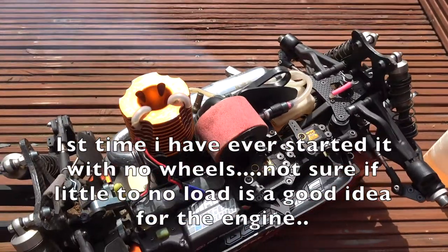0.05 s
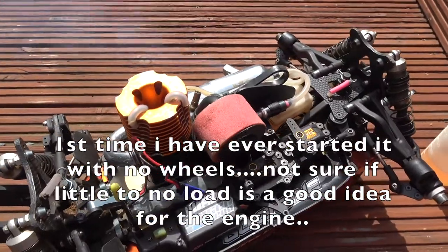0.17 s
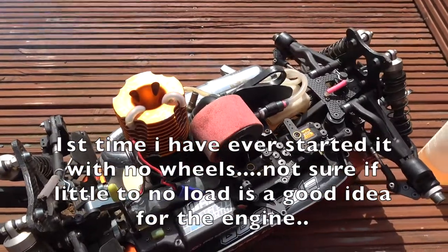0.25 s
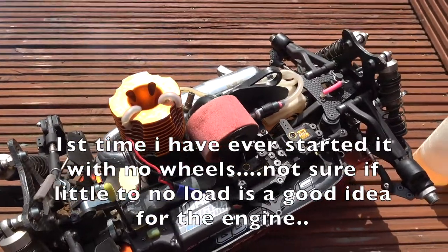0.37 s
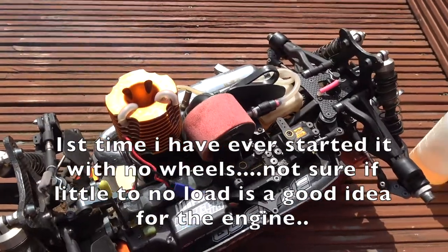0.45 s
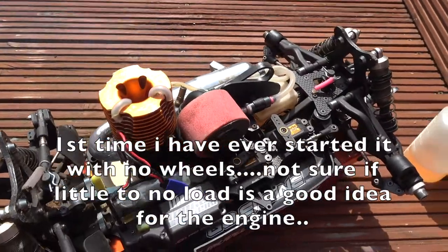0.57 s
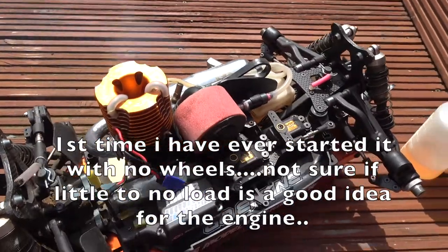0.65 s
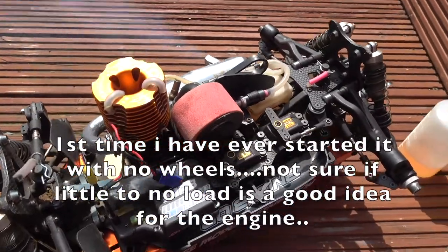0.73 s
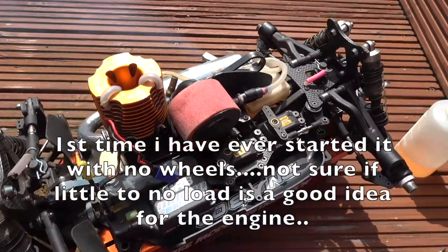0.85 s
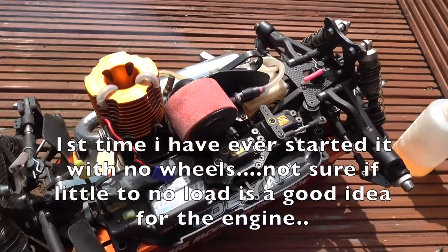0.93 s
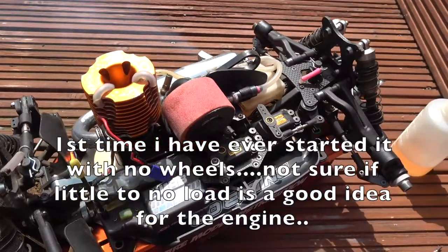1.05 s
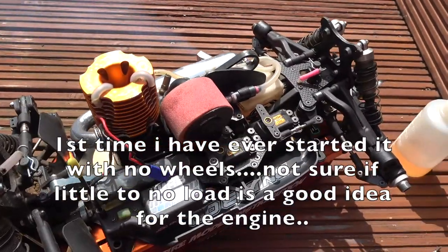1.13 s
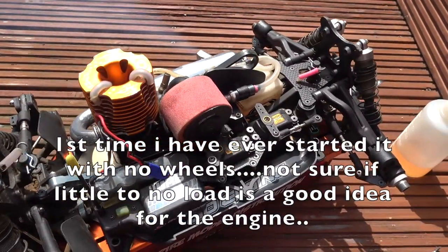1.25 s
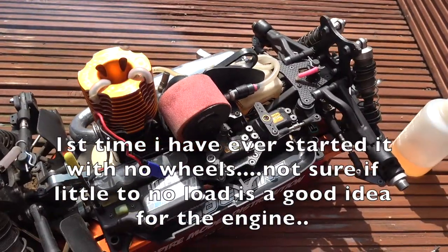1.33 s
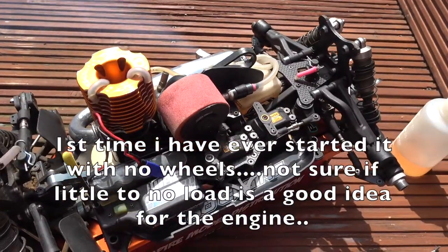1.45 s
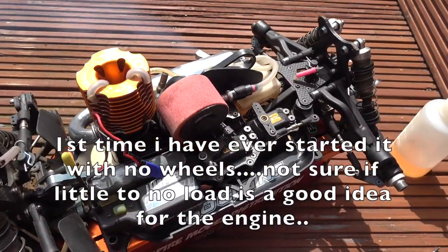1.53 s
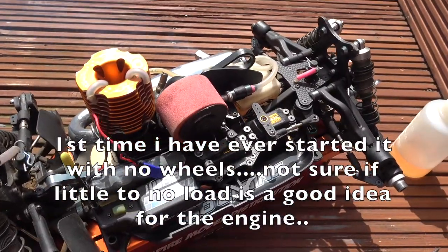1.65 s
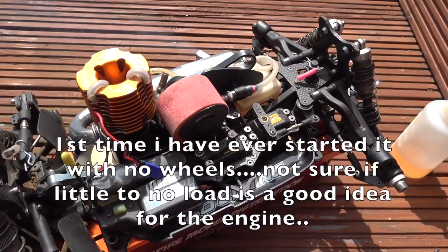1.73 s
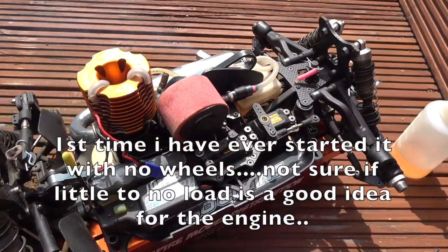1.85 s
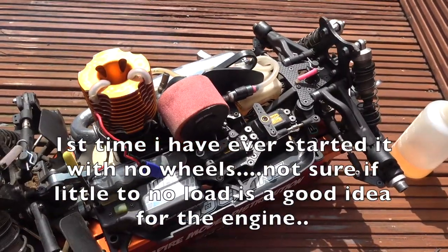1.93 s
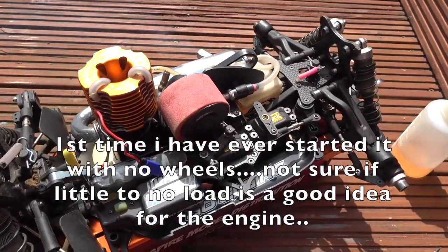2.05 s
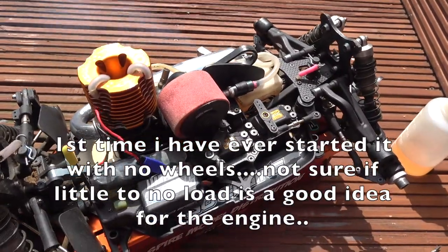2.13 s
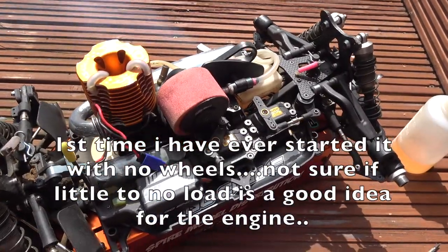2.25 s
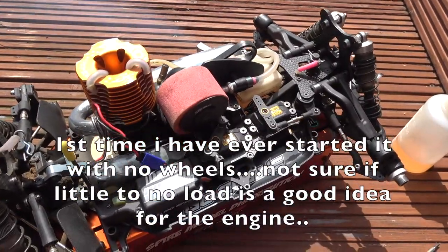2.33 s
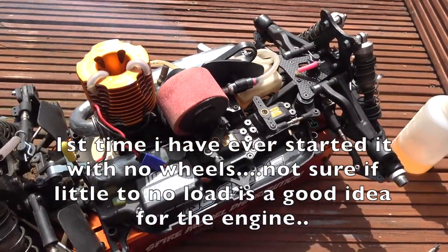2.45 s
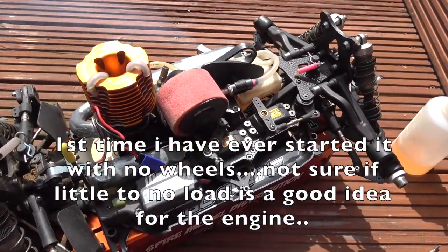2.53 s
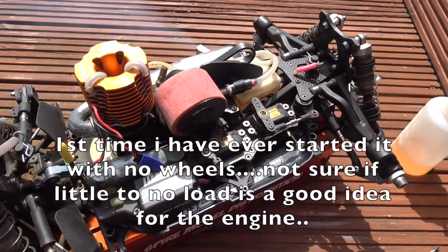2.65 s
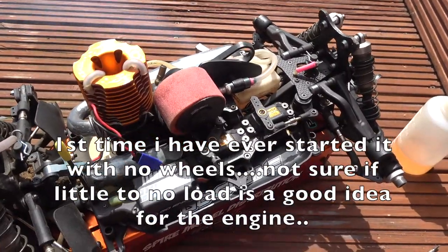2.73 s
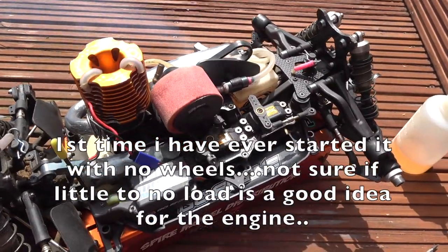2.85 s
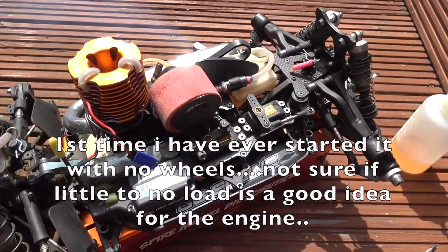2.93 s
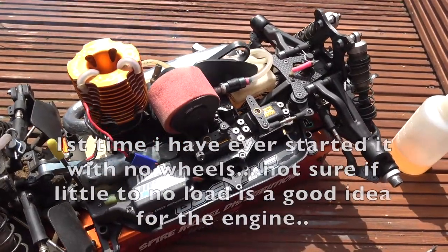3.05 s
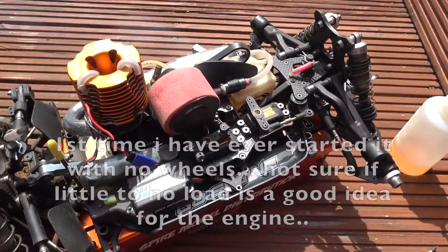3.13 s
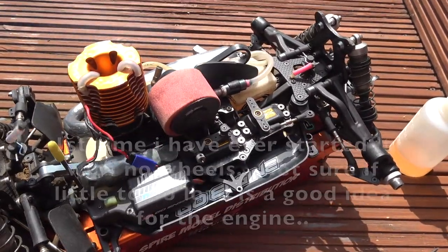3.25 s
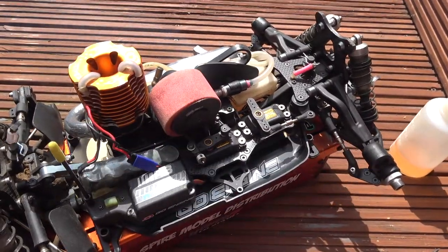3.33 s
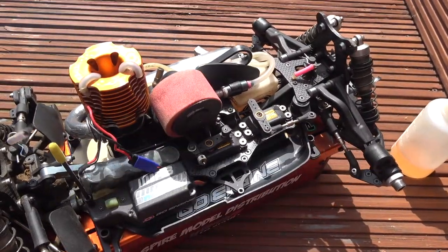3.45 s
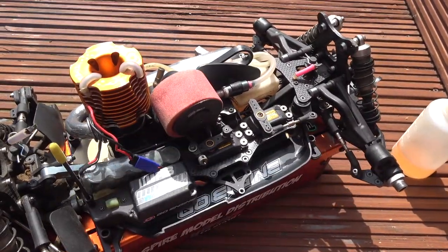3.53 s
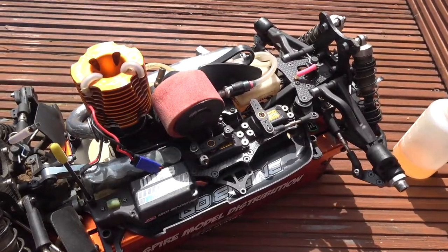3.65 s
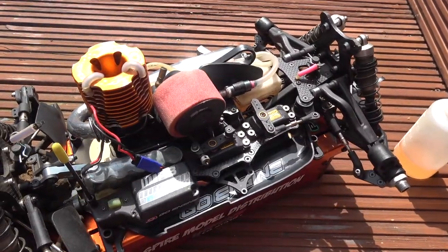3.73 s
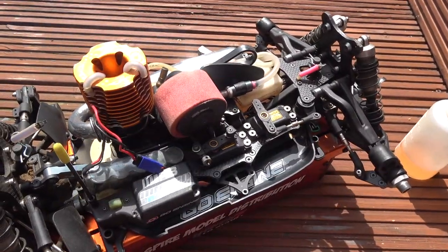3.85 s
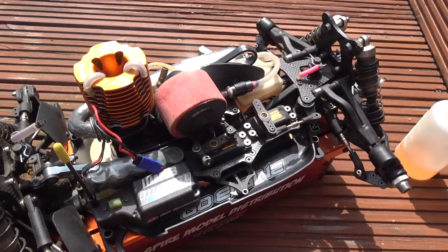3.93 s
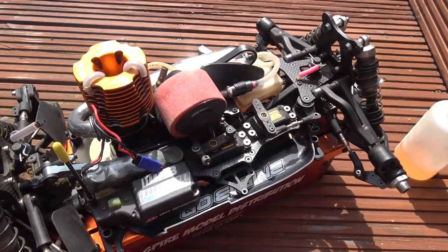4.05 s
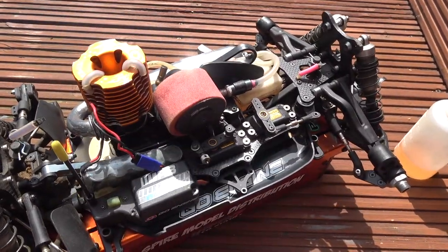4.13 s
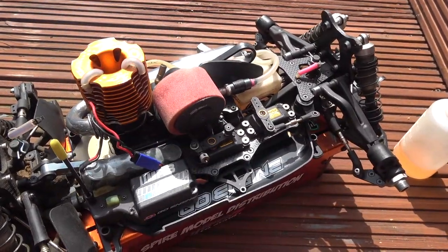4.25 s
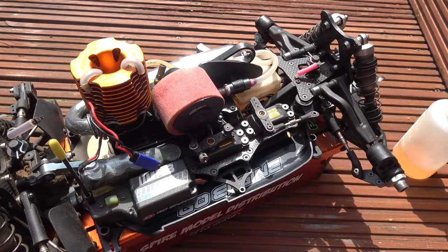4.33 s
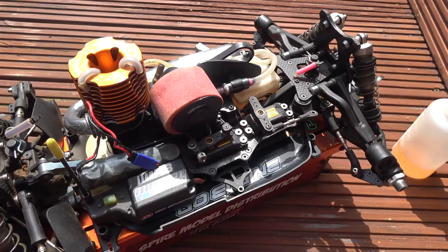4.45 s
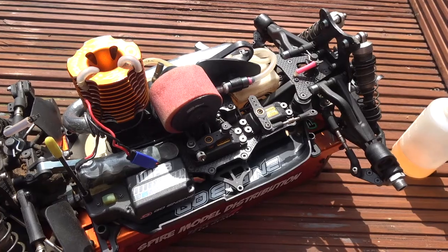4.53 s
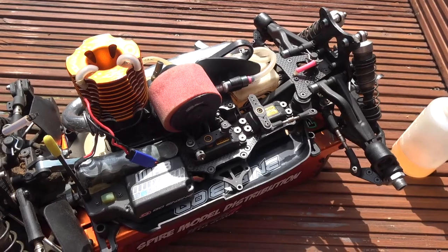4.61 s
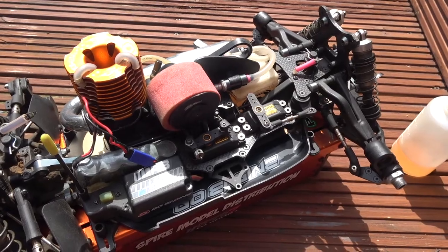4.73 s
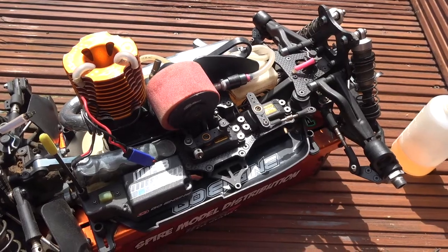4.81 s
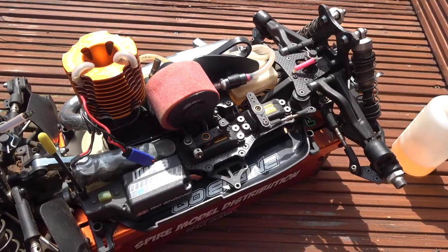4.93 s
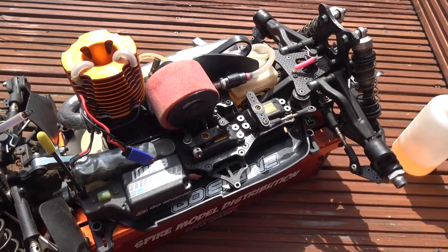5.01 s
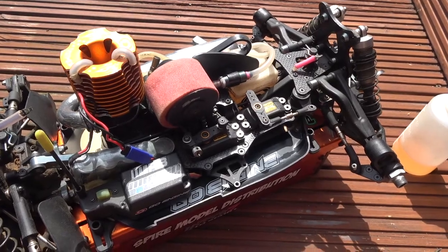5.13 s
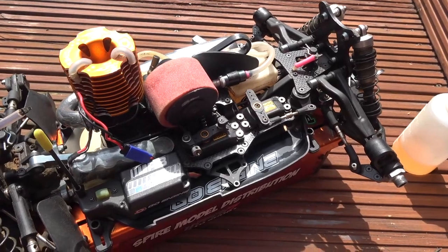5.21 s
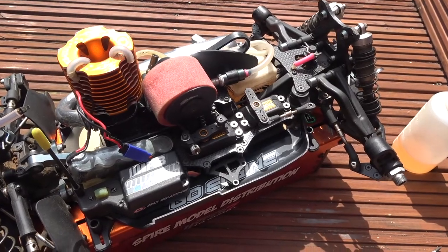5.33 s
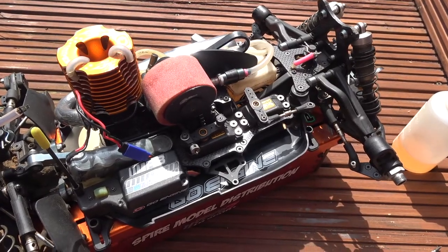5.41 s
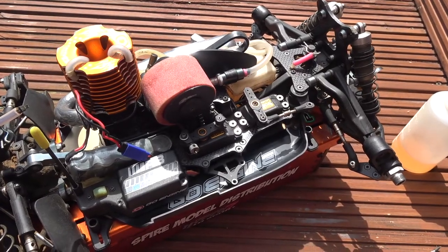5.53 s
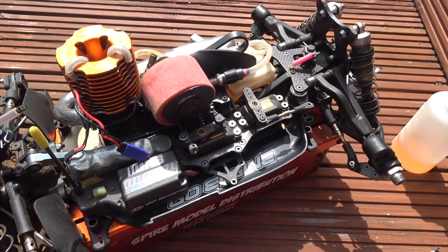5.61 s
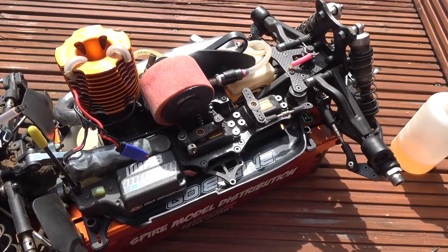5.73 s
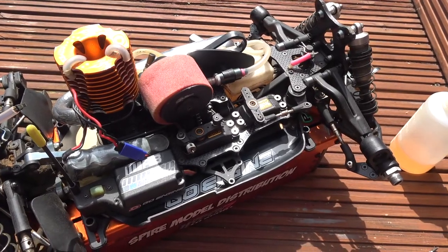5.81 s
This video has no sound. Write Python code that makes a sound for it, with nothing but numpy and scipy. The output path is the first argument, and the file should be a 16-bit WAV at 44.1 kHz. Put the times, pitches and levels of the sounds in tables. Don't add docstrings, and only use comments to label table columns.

```python
import sys
import numpy as np
from scipy import signal
from scipy.fft import rfft, irfft
from scipy.io import wavfile
from scipy.ndimage import uniform_filter1d

SR = 44100
rng = np.random.default_rng(int(sys.argv[2]) if len(sys.argv) > 2 else 0)


def nominal_scale(level):
    x = np.asarray(level, float) / 20
    return 10 ** x


def int16_out(signal):
    q = np.round(np.clip(np.atleast_2d(signal).T, -1, 1) * 32767)
    wavfile.write(sys.argv[1], SR, q.astype(np.int16))


N = 258867
HZ = np.fft.rfftfreq(N, 1 / SR)

# (time [s], peak [dB], metal crack against the peak [dB])
HARD_FIRINGS = [(3.5113, -12.5, -11), (3.5916, -11.5, -16), (3.632, -13.5, -18), (3.6629, -12, -17),
                (3.7153, -10.5, -17), (3.7871, -10, -16), (3.8365, -10, -15), (3.8655, -14, -17),
                (3.9448, -13, -27), (3.9947, -10.5, -15), (4.0231, -11.5, -18), (4.0421, -11, -25),
                (4.0725, -12, -26), (4.1019, -11, -22), (4.1408, -11, -20), (4.1912, -10, -18),
                (4.2107, -11, -27), (4.2491, -10.5, -23), (4.2985, -13, -21), (4.3174, -6.5, -12.5),
                (4.3543, -8.5, -15.5), (4.3818, -12, -22), (4.4192, -7.5, -16.5), (4.4466, -11, -26),
                (4.4661, -13, -27), (4.4855, -10, -20), (4.5334, -10.5, -24), (4.5629, -9.5, -20),
                (4.5913, -8.5, -16), (4.6187, -9.5, -26.5), (4.6472, -7.5, -15.5), (4.6751, -7.5, -16),
                (4.7031, -6.5, -13), (4.731, -9, -25), (4.7599, -9, -24), (4.7894, -6, -19),
                (4.8083, -8, -23), (4.8452, -6.5, -25), (4.8826, -9, -22), (4.9011, -8, -20),
                (4.9285, -8, -24), (4.9465, -9, -20), (4.9744, -7, -26), (5.0313, -4.5, -17.5),
                (5.0682, -7.5, -20), (5.0867, -6, -21), (5.1046, -8, -20), (5.151, -5.5, -22),
                (5.1874, -4.5, -21.5), (5.2244, -6, -17), (5.2428, -4.5, -16), (5.2703, -4.5, -13),
                (5.2977, -3, -13.5), (5.3251, -6.5, -26), (5.3431, -9, -22), (5.3616, -3.5, -24),
                (5.38, -4, -20), (5.4079, -8, -27), (5.4259, -6, -18), (5.4538, -5, -17), (5.4813, -5, -24),
                (5.5182, -5, -19), (5.5461, -3, -19), (5.5826, -4, -17), (5.6095, -2, -17),
                (5.6274, -8, -25), (5.6464, -3, -20), (5.6743, -2, -19), (5.7008, -2.5, -16),
                (5.7372, -3.5, -22), (5.7552, -1, -14.5), (5.7826, -2.5, -19), (5.809, -2.5, -18),
                (5.837, -4, -21), (5.8554, -0.5, -20)]
# (time [s], how settled the orders are [0-1], strong-weak alternation of turns [0-1])
HELD_THROTTLE = [(0, 1, 1), (.19, 0.98, 0.88), (.25, 0, 0), (.77, 0.27, 0.3), (.82, 0.91, 0.3),
                 (.87, 0.98, 1), (1.6, 0.91, 0.94), (1.66, 0, 0), (2.21, 0.17, 0.07), (2.26, 0.91, 0.2),
                 (2.3, 0.94, 1), (2.99, 1, 0.9), (3.05, 0, 0)]


def read(table):
    s, *columns = np.transpose(table)
    return [np.interp(np.arange(N) / SR, s, c) for c in columns]


def over_hz(points):
    hz, value = np.transpose(points)
    return np.interp(np.log(HZ + 1), np.log(hz), value)


def unit(x):
    return x / np.sqrt(np.mean(x ** 2))


def ring(x, modes, order=1):
    bank = 0
    for k, (f, width, db) in enumerate(modes):
        detuning = (HZ / f - f / (HZ + 1e-9)) * f / width
        bank = bank + (-1) ** k * nominal_scale(db) / (1 + 1j * detuning) ** order
    return irfft(rfft(x) * bank, N)


def walk(rate, channels=1):
    hold = int(SR / rate)
    steps = np.repeat(rng.standard_normal((channels, N // hold + 1)), hold, axis=1)
    return 1.26 * uniform_filter1d(steps, hold, axis=1)[:, :N]


def pulses(turns, size):
    at = np.flatnonzero(np.diff(np.floor(turns)) > 0)
    late = (np.floor(turns[at + 1]) - turns[at]) / (turns[at + 1] - turns[at])
    out = np.zeros(N)
    out[at], out[at + 1] = (1 - late) * size[:len(at)], late * size[:len(at)]
    return out


def crank(hz):
    turns = np.cumsum(hz) / SR
    at = (np.array(HARD_FIRINGS)[:, 0] * SR).astype(int)
    gaps = np.round(np.diff(turns[at], prepend=turns[at[0]]))
    gaps = np.maximum(gaps, at > at[0])
    whole = np.round(turns[at[0]]) + np.cumsum(gaps)
    slip = np.interp(np.arange(N), np.r_[at[0] - SR // 10, at], np.r_[0, whole - turns[at]])
    return turns + slip, whole.astype(int)


def song(turns, hz, first_db, song_db):
    # (multiple of half the crank speed, level [dB])
    orders = [(1, -25.5), (2, 0), (3, -16), (4, -5), (5, -21), (6, -8.5), (7, -7), (8, 4.5), (9, -19),
              (10, -5.5), (11, -19), (12, -5), (13, -14.5), (14, -7.5), (15, -5.5), (16, -5.5), (17, -39.5),
              (18, -11), (19, -12.5), (20, -10.5), (21, -9), (22, -12), (23, -14.5), (24, -7.5),
              (25, -18.5), (26, -7), (27, -15), (28, -15), (29, -13), (30, -20), (31, -17), (32, -27.5),
              (33, -26), (34, -15), (35, -33), (36, -26), (37, -23), (38, -15), (39, -25), (40, -16.5)]
    # (frequency [Hz], width [Hz], level [dB])
    swept_modes = [(485, 116, -0.5), (986, 226, -2.5), (1420, 105, -4.5), (1850, 220, -11),
                   (2410, 220, -2.5), (2710, 200, -5.5), (3310, 240, -3), (4300, 240, -4),
                   (5240, 630, -11.5), (7530, 980, -11)]
    song_speed_hz = 565
    settled, alternate = np.clip(read(HELD_THROTTLE), 0, 1)
    waver = walk(18, channels=2 * len(orders)).reshape(2, len(orders), N)
    start = 2 * np.pi * rng.random(len(orders))
    idling_db = -7.0 * np.log2(np.clip(hz / 200, 0, 1)) ** 2
    low, high = 0, 0
    for k, (half, db) in enumerate(orders):
        phase = np.pi * half * turns + start[k] + 0.17 * waver[1, k]
        line = nominal_scale(1.85 * waver[0, k]) * np.sin(phase) * np.sqrt(2)
        if half == 2:
            gain = nominal_scale(first_db + 2.39 * idling_db)
        else:
            gain = nominal_scale(song_db + db - 6.0) * (alternate if half % 2 else settled)
        if half < 6:
            low = low + line * gain
        else:
            high = high + line * gain
    uneven = nominal_scale(1.7 * rng.standard_normal(N // 50))
    beats = ring(pulses(turns, uneven), swept_modes) / np.sqrt(hz / song_speed_hz)
    sweep = nominal_scale(song_db + idling_db + 25.5) * np.sqrt(1 - settled ** 2) * beats
    return low * nominal_scale(np.array([[.8], [-.8]])) + high + sweep


def exhaust(turns, fired, hz, puff_db):
    # (frequency [Hz], width [Hz], level [dB])
    pipe_modes = [(208.4, 67, -3.5), (314, 89, -9.5), (436, 114, -3.5), (570, 160, -15.5), (813, 118, -8),
                  (1286, 600, 3), (2144, 220, -5), (2660, 130, -11.5)]
    # (frequency [Hz], width [Hz], level [dB])
    metal_modes = [(2090, 200, 2), (2740, 140, -2), (3540, 150, -2), (4070, 180, -4), (5120, 310, -4),
                   (7150, 155, -4), (9000, 1800, -20)]
    # (time [s], peak [dB], metal crack against the peak [dB])
    catches = [
        (0.6632, -17, -14),
        (0.684, -11, -11),
        (0.6978, -7.5, -3),
        (2.1258, -13, -10),
        (2.1391, -14, -6),
    ]
    at = np.flatnonzero(np.diff(np.floor(turns)) > 0)
    chance = rng.standard_normal((len(at), 2)).T
    speed = hz[at] / 100
    size_db = puff_db[at] - 0.87 * np.log2(speed) ** 2 + 1.5 * chance[0]
    size = nominal_scale(size_db) / np.sqrt(speed)
    crack = size * nominal_scale(-34 + 2.5 * chance[1])
    row = np.clip(fired - int(turns[at[0] + 1]), 0, len(at) - 1)
    _, peak_db, crack_db = np.transpose(HARD_FIRINGS)
    size[row] = nominal_scale(peak_db - 11)
    crack[row] = nominal_scale(peak_db + crack_db - 6)
    puffs, cracks = pulses(turns, size), pulses(turns, crack)
    for s, peak_db, crack_db in catches:
        puffs[int(s * SR)] += nominal_scale(peak_db - 10.5)
        cracks[int(s * SR)] += nominal_scale(peak_db + crack_db - 0.5)
    decay = np.exp(-1 / (0.0046 * SR))
    burst = signal.lfilter([1], [1, -decay], cracks) * rng.standard_normal(N)
    through_pipe = nominal_scale(34.5) * ring(puffs, pipe_modes, order=3)
    return through_pipe + nominal_scale(13) * ring(burst + 3.6 * cracks, metal_modes)


def rasp(turns, hz, rasp_db):
    # (frequency [Hz], density [dB per Hz])
    held_colour = [(88, -72), (150, -31.5), (501, -29), (563, 0.5), (632, -35), (1030, -18), (1110, -18),
                   (1520, -35), (1640, -15.5), (2240, -15), (2420, -13), (4330, -12), (15600, -22)]
    # (frequency [Hz], density [dB per Hz])
    fast_colour = [(180, -34), (300, -11.5), (653, -8.5), (783, -14), (955, -6), (1130, -11), (1370, -17),
                   (1590, -4), (2180, 1.5), (4300, 1.5), (15600, -15.5)]
    # (frequency [Hz], density [dB per Hz])
    slow_colour = [(88, -34), (150, -15), (201, -17), (259, -22), (412, -9), (697, -18.5), (798, -16),
                   (1300, -0.5), (1740, -16), (2190, -12.5), (2420, -13.5), (7180, -28.5), (15600, -42.5)]
    held = np.clip(read(HELD_THROTTLE)[0], 0, 1)
    fast = np.clip((hz - 110) / 120, 0, 1)
    gate = (.5 + 0.62 * np.exp(-(turns % 1) / 0.28)) * nominal_scale(1.36 * walk(40)[0])
    mid, side = rfft(gate * rng.standard_normal((2, N)))
    apart = np.clip(HZ / 14000, .08, .4)
    ports = mid + apart * side * np.array([[1], [-1]])
    colours = (held_colour, fast_colour, slow_colour)
    loaded, quick, slow = (unit(irfft(ports * nominal_scale(over_hz(c)), N)) for c in colours)
    at_speed = held * loaded * nominal_scale(-3.5) + (fast - held * fast) * quick * nominal_scale(-2)
    return nominal_scale(rasp_db) * (at_speed + (1 - fast) * slow * nominal_scale(6.5))


def bell(hz):
    # (time [s], level [dB])
    whistle = [(0.0, -39), (0.31, -43), (0.54, -45), (0.67, -62), (0.7, -46), (0.73, -38), (1.65, -37),
               (1.67, -34), (1.96, -42.5), (2.11, -58), (2.16, -39), (2.91, -36), (3.11, -40), (3.6, -56),
               (4.58, -64), (4.9, -57), (4.92, -41), (4.95, -59), (5.07, -53), (5.21, -43), (5.25, -50),
               (5.28, -47), (5.56, -39.5), (5.57, -43.5), (5.87, -39.5)]
    # (frequency [Hz], width [Hz], level [dB])
    bell_modes = [(9480, 150, 7), (13350, 170, -1), (9150, 460, -14), (12100, 200, -22)]
    level_db, = read(whistle)
    fits = nominal_scale(2.4 * walk(35)[0])
    grazing = unit(ring(fits * rng.standard_normal(N), bell_modes))
    return nominal_scale(level_db + 1.5) * np.clip((330 - hz) / 150, 0, 1) * grazing


def deck():
    # (time [s], level [dB])
    shaking = [(0.0, -60), (0.13, -69), (0.23, -59), (0.29, -79), (0.67, -90), (0.75, -55), (0.9, -60),
               (1.0, -71), (1.16, -65), (1.58, -64), (1.68, -58), (1.77, -80), (2.03, -82), (2.26, -51),
               (2.34, -69), (2.4, -54), (2.5, -62), (2.65, -61), (2.81, -71), (2.97, -64), (3.16, -80),
               (4.63, -75), (4.69, -60), (4.79, -77), (4.95, -75), (5.13, -78), (5.28, -79), (5.38, -73),
               (5.87, -67)]
    # (time [s], peak [dB], pitch [Hz])
    hops = [
        (0.885, -33, 248),
        (2.14, -28, 188.1),
        (2.259, -35, 207),
        (2.409, -42, 253.8),
    ]
    level_db, = read(shaking)
    boards = signal.butter(3, [42, 160], "band", fs=SR, output="sos")
    mid, side = signal.sosfilt(boards, rng.standard_normal((2, N)))
    out = nominal_scale(level_db + 5.5) * unit(mid + 0.28 * side * np.array([[1], [-1]]))
    t = np.arange(SR // 10) / SR
    swell = t / 0.0046 * np.exp(-t / 0.0051)
    for s, peak_db, hz in hops:
        i = int(s * SR)
        out[:, i:i + len(t)] += nominal_scale(peak_db + 7.5) * swell * np.sin(2 * np.pi * hz * t)
    return out


def garden(engine):
    t = np.arange(SR // 4) / SR
    tail = rng.standard_normal((2, SR // 4)) * nominal_scale(-60 * t / 0.16)
    return nominal_scale(-50) * signal.fftconvolve(engine, tail, axes=1)[:, :N]


def scene():
    # (time [s], crank speed [Hz])
    crank_speed = [(0.0, 557.2), (0.16, 547.8), (0.19, 545), (0.24, 483.0), (0.34, 319.4), (0.46, 215.2),
                   (0.5, 170.5), (0.65, 106.4), (0.67, 135.7), (0.69, 219.6), (0.7, 279.7), (0.72, 346),
                   (0.73, 407), (0.75, 458.6), (0.77, 496.3), (0.8, 563.9), (0.85, 591.1), (1.01, 566),
                   (1.26, 557.6), (1.5, 565.6), (1.6, 558), (1.67, 481), (1.8, 293), (1.89, 213.4),
                   (1.99, 141), (2.06, 120), (2.09, 102.1), (2.11, 132.4), (2.12, 210), (2.14, 267.2),
                   (2.16, 333.7), (2.17, 394), (2.19, 434.5), (2.22, 517.4), (2.24, 553.7), (2.27, 591.2),
                   (2.6, 555.7), (2.66, 583), (2.71, 572.6), (2.94, 563), (2.99, 548.1), (3.04, 496),
                   (3.2, 264.6), (3.27, 216.7), (3.37, 147.5), (3.4, 137.7), (3.43, 132.1), (3.55, 98.7),
                   (3.68, 96.2), (3.99, 100.7), (4.02, 101), (4.09, 99.9), (4.22, 101), (4.3, 99),
                   (4.35, 106.3), (4.43, 106), (4.48, 100.8), (4.54, 102), (4.59, 106), (4.79, 100),
                   (4.82, 106.5), (4.92, 107.8), (5.0, 107), (5.12, 108.7), (5.87, 107.4)]
    # (time [s], first order [dB], song [dB], puff [dB], rasp [dB])
    engine_levels = [(0.0, -18.5, -15, -37, -16), (0.15, -18.5, -15.5, -22, -19.5),
                     (0.23, -17.5, -17, -31, -17), (0.28, -19.5, -14, -31, -15),
                     (0.33, -36.5, -15.5, -27, -17), (0.44, -31.5, -22.5, -28, -20.5),
                     (0.55, -48, -39.5, -35, -35.5), (0.57, -47, -34, -33, -31.5),
                     (0.65, -40, -42, -30, -41), (0.7, -34.5, -14, -17, -24), (0.73, -35, -13, -31, -18),
                     (0.75, -24, -10.5, -30, -14), (0.78, -18, -9.5, -6, -17.5),
                     (0.83, -20.5, -13.5, -28, -26), (0.88, -17.5, -16, -42, -20),
                     (1.0, -18, -14.5, -34, -23), (1.14, -18.5, -15, -21, -19.5),
                     (1.57, -22.5, -15, -22, -22), (1.68, -14.5, -15.5, -31, -13.5),
                     (1.75, -33, -13, -25, -17), (1.81, -35, -20, -40, -19.5),
                     (1.86, -31, -17.5, -24, -22.5), (2.01, -46, -41.5, -31, -35),
                     (2.11, -41, -39, -26, -39), (2.14, -38, -13, -19, -23), (2.16, -30, -10, -28, -16),
                     (2.17, -35.5, -11, -26, -16.5), (2.21, -17, -9, -22, -16), (2.22, -17.5, -9, -2, -20),
                     (2.29, -19, -15, -36, -19.5), (2.52, -20, -16, -17, -20), (2.63, -20, -14.5, -13, -21),
                     (2.66, -17, -15, -39, -19), (2.76, -20.5, -15, -29, -19), (2.96, -17.5, -15, -27, -20),
                     (3.01, -18, -16, -32, -18), (3.07, -18.5, -16, -27, -14.5),
                     (3.12, -34, -15.5, -25, -16.5), (3.25, -32.5, -23.5, -23, -23.5),
                     (3.35, -38, -36.5, -38, -30.5), (3.56, -42.5, -38, -30, -42),
                     (5.4, -30.5, -38, -19.5, -32.5), (5.87, -31.5, -29, -18, -33)]
    hz, = read(crank_speed)
    first_db, song_db, puff_db, rasp_db = read(engine_levels)
    turns, fired = crank(hz)
    engine = song(turns, hz, first_db, song_db) + exhaust(turns, fired, hz, puff_db) + bell(hz)
    return engine + garden(engine) + rasp(turns, hz, rasp_db) + deck()


def low_pass(x):
    return signal.sosfilt(signal.butter(12, 15780, fs=SR, output="sos"), x)


def record(dry):
    # (frequency [Hz], left minus right [dB])
    port_db = [(60, 0.5), (110, 0.44), (200, 4.1), (380, 0.79), (700, 4.3), (1290, 2.9), (2380, 1.3),
               (4400, 0.27), (8120, 2), (15000, 1.1)]
    # (frequency [Hz], phase by which left leads [rad])
    port_rad = [(0, 0), (5680, 0.061), (5940, -0.43), (7670, -0.2), (13300, -0.25), (15300, 0.0)]
    with np.errstate(divide="ignore"):
        half = nominal_scale(over_hz(port_db) / 2) * np.exp(.5j * over_hz(port_rad))
    heard = irfft(rfft(dry) * np.array([half, 1 / half]), N)
    limited = np.tanh(0.89 * heard) / 0.93
    mix = irfft(rfft(limited) * (HZ < 15800), N)
    return low_pass(mix)


dry = scene()
out = record(dry)
int16_out(out)
```